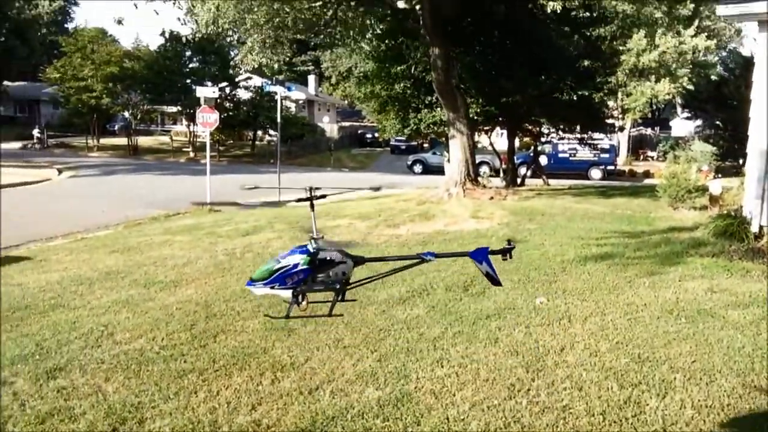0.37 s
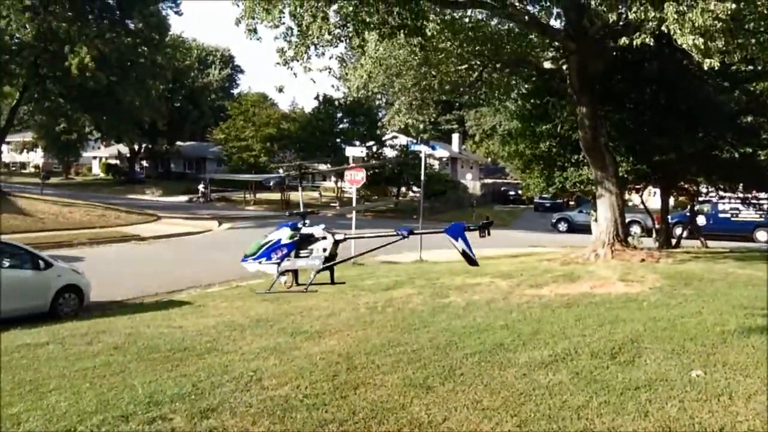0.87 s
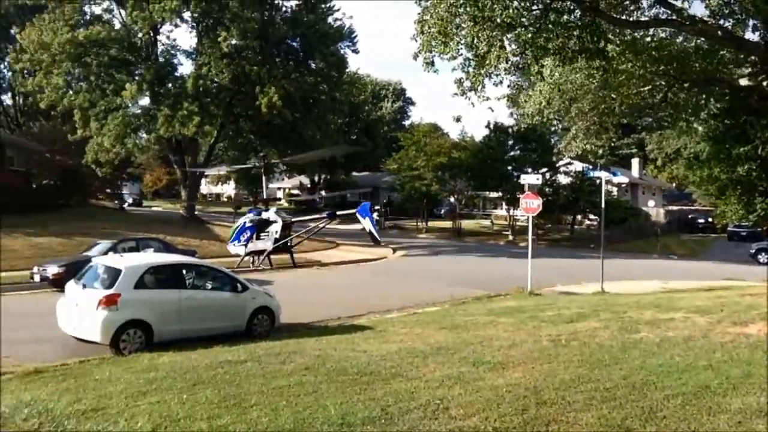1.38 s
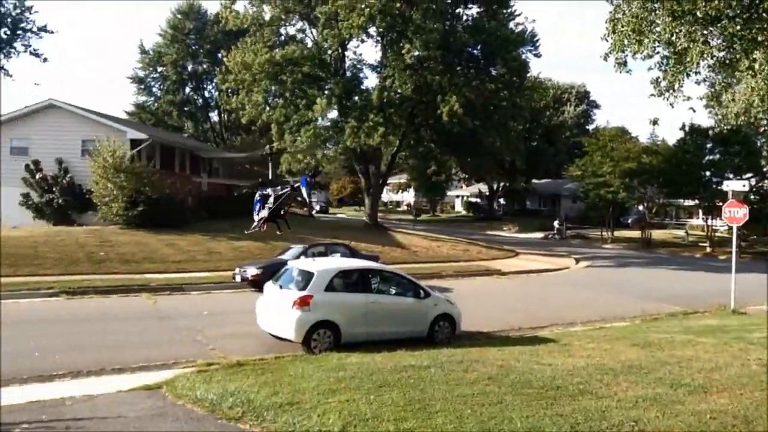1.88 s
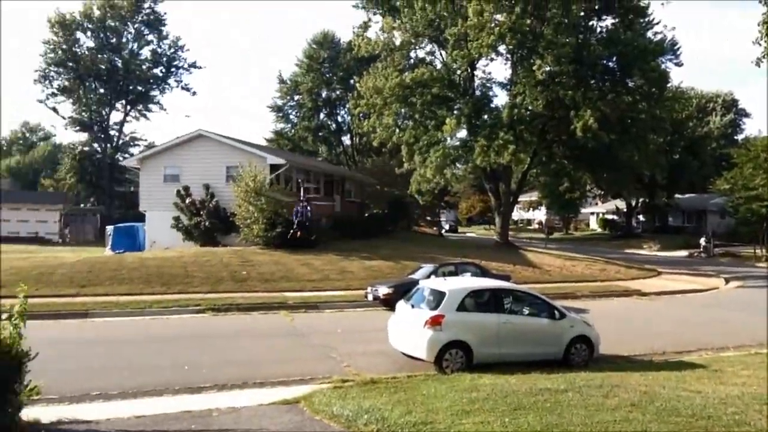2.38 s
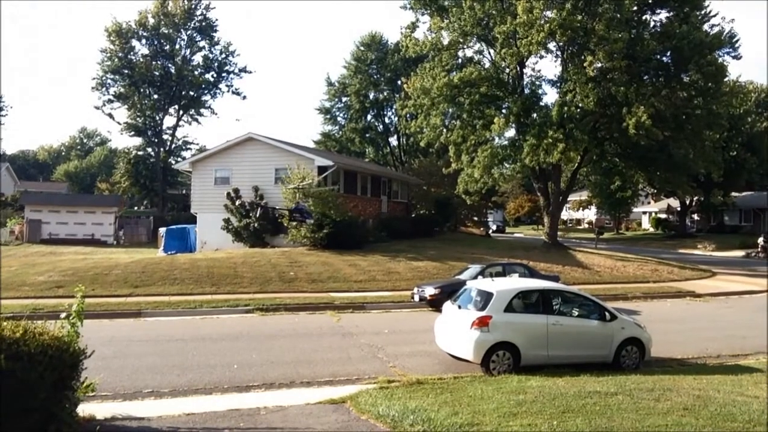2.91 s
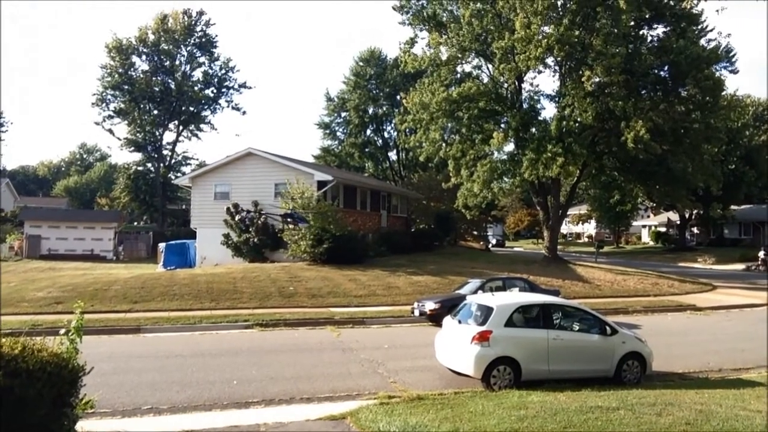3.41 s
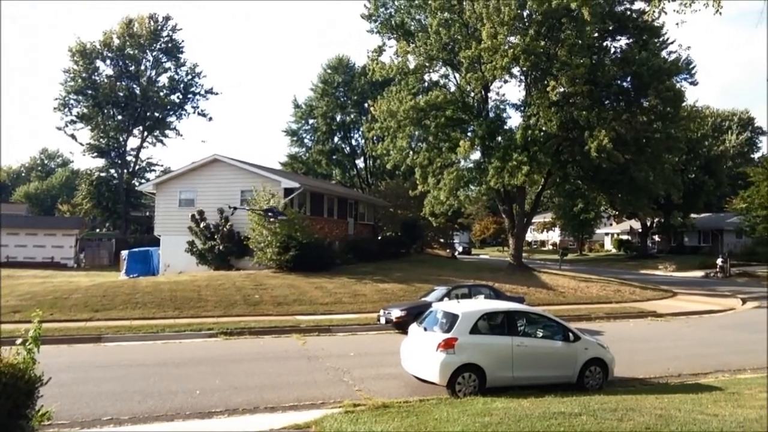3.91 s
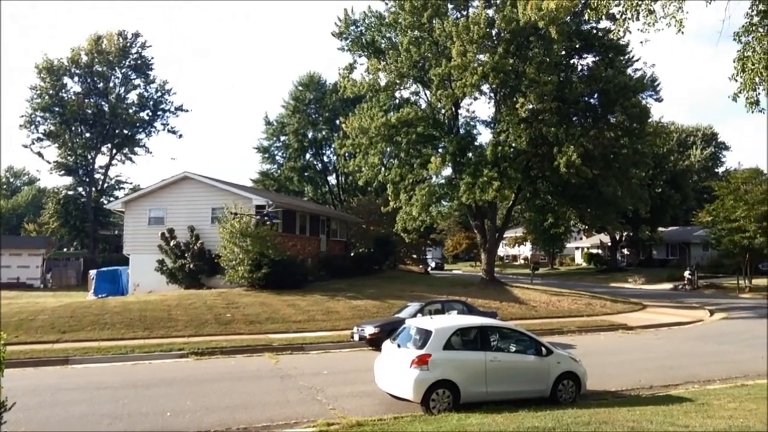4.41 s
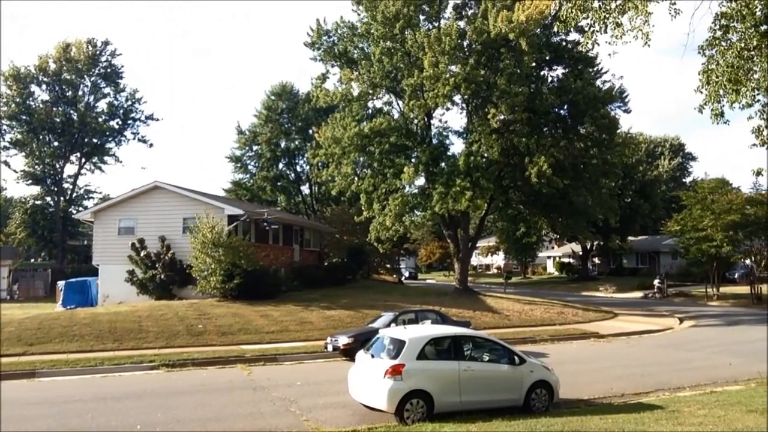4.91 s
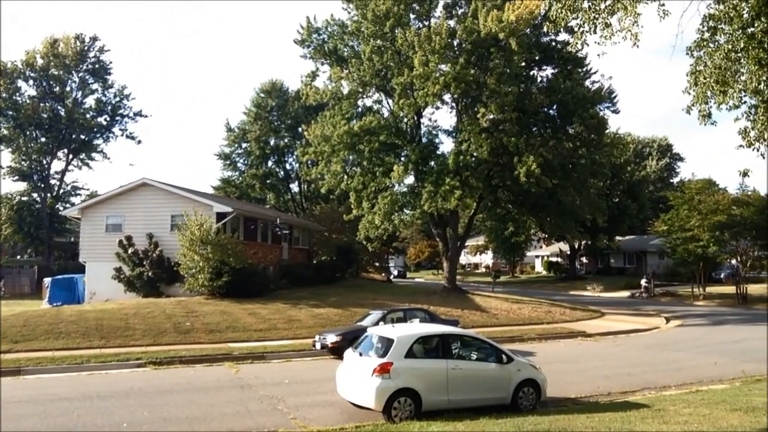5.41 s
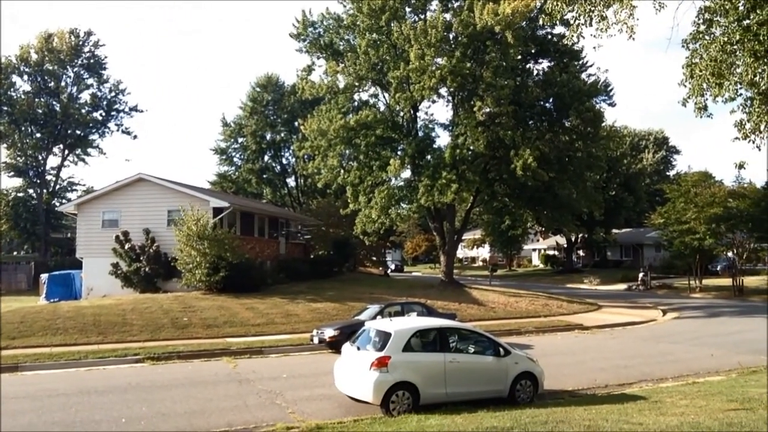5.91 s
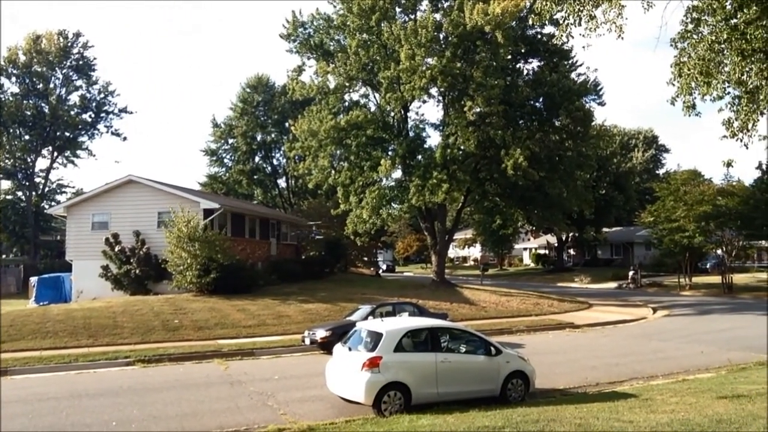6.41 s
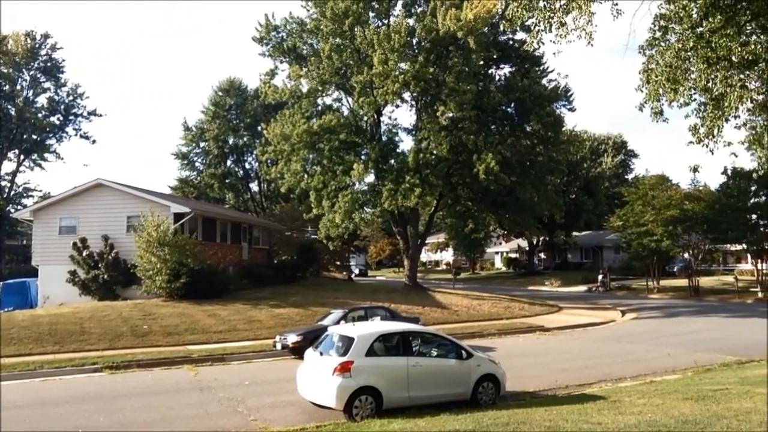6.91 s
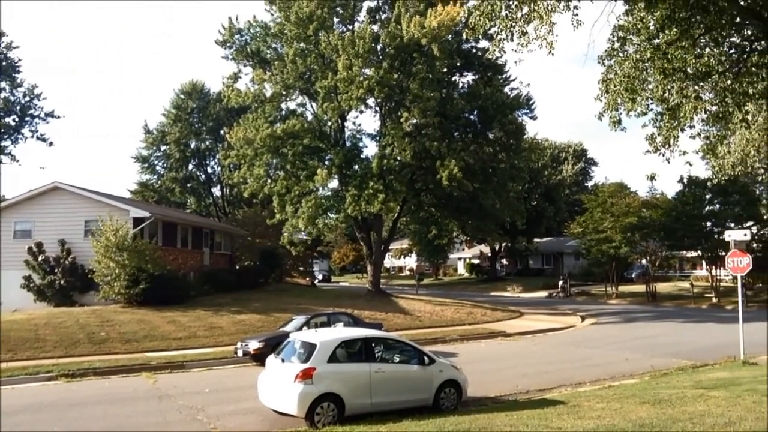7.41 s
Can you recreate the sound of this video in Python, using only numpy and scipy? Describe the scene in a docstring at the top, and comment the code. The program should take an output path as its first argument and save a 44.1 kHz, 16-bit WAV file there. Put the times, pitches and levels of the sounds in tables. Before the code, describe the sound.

A toy-sized electric helicopter is already flying close to the microphone, with two high gear whines gliding against each other over gear rattle and strong brushy hiss. A small tail motor hums below. After about two seconds it flies away, steadily growing quieter and duller, its pitch wavering. A very faint street rumble lies beneath. Open outdoor lawn, one fixed microphone, identical in both channels.

```python
"""A small electric model helicopter with two counter-turning rotors hovers close, then flies off over a lawn.
Each rotor has its own motor and two-stage gear: two whines, built from the tooth-mesh tones of each motor shaft,
glide against each other over filtered noise, the hiss of brushes and blades. A tail motor hums below.
A quiet street lies under it: shaped rumble and the hum of one passing car. One microphone hears it all."""
import sys
import numpy as np
from scipy import signal
from scipy.fft import rfft, irfft, next_fast_len
from scipy.io import wavfile
from scipy.ndimage import uniform_filter1d, map_coordinates

SR = 44100
rng = np.random.default_rng(int(sys.argv[2]) if len(sys.argv) > 2 else 0)


def inscribe(sig):
    """Save sig as 16-bit PCM at rate SR to the path in sys.argv[1].

    A 1-D sig is mono; a 2-D sig holds one channel per row.
    Samples are clipped to [-1, 1] before scaling.
    """
    pcm = np.round(np.clip(np.atleast_2d(sig).T, -1, 1) * 32767)
    wavfile.write(sys.argv[1], SR, pcm.astype(np.int16))


def invert_db(level):
    """Linear amplitude ratio for a level in decibels (20 dB per decade), elementwise."""
    return 10 ** (np.asarray(level, dtype=float) / 20)


N = 332955

# the craft's way out from the microphone: (time [s], distance [m], treble tilt of the hiss [dB, full at 19 kHz])
FLIGHT_PATH = [(0, 1.98, -3), (.2, 1.98, -0.5), (1.3, 2.03, -2), (1.6, 2.22, -0.5), (2.67, 4.57, -2.5),
               (3.36, 6.1, 0), (3.8, 6.3, 0), (4.2, 7.44, -0.5), (4.7, 8.7, -3.5), (6, 11.7, -5),
               (7.55, 13.2, -7.5)]
PINION, IDLER, SECOND = 8, 31, 22  # teeth: motor pinion, idler wheel, second-stage pinion


def unit(x):
    """Scale to rms 1."""
    return x / np.sqrt(np.mean(x ** 2) + 1e-20)


def along(points, hz):
    """Read (Hz, value) points on a log frequency axis."""
    f, v = np.transpose(points)
    return np.interp(np.log(hz + 1), np.log(f + 1), v)


def curves(rows):
    """One value per sample for each column after the time."""
    s, *cols = np.transpose(rows)
    return [np.interp(np.arange(N) / SR, s, c) for c in cols]


def wobble(rate):
    """A random curve of straight pieces between normal knots, rate knots a second."""
    knots = rng.standard_normal(int(N * rate / SR) + 4)
    return map_coordinates(knots, [np.arange(N) * rate / SR], order=1)


def turns(hz):
    """Phase in radians of a turning shaft; its speed is smoothed over 50 ms, as by inertia."""
    return 2 * np.pi * np.cumsum(uniform_filter1d(hz, size=2200)) / SR


def filtered(x, response):
    """x shaped by a response, a function of frequency in Hz."""
    m = next_fast_len(N + 8192)
    spectrum = rfft(x, m) * response(np.fft.rfftfreq(m, 1 / SR))
    return irfft(spectrum, m)[..., :N]


def tone(phase, db, flutter_db, drift):
    """A line at rms level db that flutters in level and, by drift radians, in phase, like a rocking craft."""
    level = invert_db(db + flutter_db * wobble(22))
    return level * np.sqrt(2) * np.sin(phase + drift * wobble(45) + 7 * rng.random())


def blurred(phase, db, rate):
    """A band of noise riding on a moving order; more knots a second spread it wider."""
    return invert_db(db) * unit(wobble(rate) * np.sin(phase) + wobble(rate) * np.cos(phase))


def street():
    """Far traffic as noise shaped into a slowly swaying rumble, and one passing car as a gliding hum."""
    # spectrum of the far rumble: (frequency [Hz], relative level [dB])
    rumble_shape = [(20, -45), (60, -18.5), (130, -8.5), (240, 3), (500, -8), (900, -1), (1500, -15.5),
                    (3300, -50)]
    # hum of the passing car: (time [s], frequency [Hz], level [dB])
    car_hum = [(5.8, 108.3, -87), (6.02, 112.7, -71), (6.38, 112.1, -66), (7.28, 117.1, -72),
               (7.5, 117.6, -78)]
    hz, db = curves(car_hum)
    rumble = unit(filtered(rng.standard_normal(N), lambda f: invert_db(along(rumble_shape, f))))
    rumble_db = -55 + 0.71 * wobble(3.08)
    return invert_db(rumble_db) * rumble + tone(turns(hz), db, flutter_db=0.5, drift=.2)


def craft_db():
    """Reference level of the craft at the microphone: amplitude falls as one over distance."""
    at_1m_db = -29
    return at_1m_db - 20 * np.log10(curves(FLIGHT_PATH)[0])


def strength_db(name):
    """Level of a named tone: it follows the craft's reference level, plus its own swells."""
    # usual strength: {tone name: level [dB re the craft's reference level]}
    usual_tone_level_db = {"fast 1": -7.5, "fast 2": -1, "fast 3": -7.5, "slow 1": -10.5, "slow 2": -2,
                           "slow 3": 1, "second stage": -11, "blades": -27, "imbalance": -22, "brushes":
                           -23.5, "fast 4": -5.5, "fast 6": -12, "tail brush": -17, "tail blades": -31.5,
                           "slow second stage": -16.5, "slow 4": -10, "slow 5": -14, "fast rattle": -0.5,
                           "slow rattle": 0}
    # swells and dips as the craft turns: (tone name, start [s], end [s], change [dB])
    swell_rows = [("fast 1", 0.52, 1.27, 10), ("fast 1", 1.533, 1.855, 13.4), ("fast 1", 1.99, 2.14, 14),
                  ("fast 1", 2.22, 2.445, 16), ("fast 1", 2.52, 3.086, 15), ("fast 1", 3.1, 3.5, 10),
                  ("fast 1", 3.85, 4.7, 13), ("fast 1", 7.35, 7.6, 8), ("fast 2", -.1, 0.086, 7),
                  ("fast 2", 0.14, 0.39, 1.5), ("fast 2", .52, 1.55, -5.5), ("fast 2", 1.52, 2.42, 4),
                  ("fast 2", 3.2, 3.36, 4.6), ("fast 2", 3.7, 4.08, 6.1), ("fast 2", 4.25, 4.75, 6.2),
                  ("fast 2", 4.8, 6.1, -4.5), ("fast 2", 6.25, 7.4, 7.3), ("fast 3", 0.61, 1, 7.2),
                  ("fast 3", 2.7, 3.15, 4), ("fast 3", 3.2, 4.02, 4), ("fast 3", 4.15, 4.5, 4.4),
                  ("fast 3", 4.88, 6.28, 8.3), ("fast 3", 6.3, 6.2, -8), ("fast 3", 7.12, 8.4, 7),
                  ("slow 1", 0.037, .36, 9), ("slow 1", .36, .6, 4), ("slow 1", 2.6, 3.04, 6.2),
                  ("slow 1", 3.3, 3.85, 7), ("slow 1", 3.95, 4.75, -10), ("slow 1", 4.8, 5.4, 5),
                  ("slow 2", -.1, .3, 2), ("slow 2", 0.28, 0.916, 6), ("slow 2", 0.93, 1.12, 8),
                  ("slow 2", 1.17, 1.46, 11), ("slow 2", 1.65, 2.44, 3.4), ("slow 2", 2.66, 3.13, 4.2),
                  ("slow 2", 3.44, 3.82, 5.5), ("slow 2", 3.95, 4.55, 6.6), ("slow 2", 4.75, 5.15, 2.8),
                  ("slow 2", 5.15, 5.8, 8), ("slow 2", 6.36, 6.95, 2.8), ("slow 2", 7.15, 7.6, 9),
                  ("slow 3", 0.016, 0.17, 8.8), ("slow 3", 1.2, 1.61, 8.5), ("slow 3", 1.6, 2, 2.5),
                  ("slow 3", 2.4, 3.15, -1.5), ("slow 3", 3.6, 3.85, 6.7), ("slow 3", 4.3, 4.75, 6.3),
                  ("slow 3", 5.1, 5.7, -4), ("slow 3", 5.78, 6.3, 2), ("slow 3", 6.42, 6.96, 6.2),
                  ("slow 3", 7.1, 7.45, 5), ("second stage", 0.9, 1.76, 7.5),
                  ("second stage", 1.92, 2.14, 8.5), ("second stage", 2.3, 2.65, 9),
                  ("second stage", 2.65, 3.05, 13), ("second stage", 3.2, 4.1, -10),
                  ("second stage", 5.5, 6, 8), ("second stage", 6.04, 7.6, 11.8),
                  ("blades", 3.05, 3.78, 11.7), ("imbalance", -.1, 0.94, 3.8),
                  ("imbalance", 3.08, 3.74, 7.3), ("brushes", -.1, .36, 12), ("brushes", 2.03, 3.2, 9.6),
                  ("brushes", 3.2, 4.4, 13.3), ("brushes", 5.3, 6.4, 12.3), ("slow 4", -.1, .5, 9.2),
                  ("slow 4", 5.05, 5.45, 9.2), ("fast rattle", 3.45, 4.05, 6), ("fast 4", -.1, 0.75, 2.3),
                  ("fast 4", 3.8, 5.6, -7), ("fast 6", .05, .42, 10), ("fast 6", 1.5, 2.1, 5),
                  ("fast 6", 3.45, 4.25, 9), ("fast 6", 4.9, 7.6, -6), ("tail brush", -.1, .3, -15),
                  ("tail brush", 0.38, 1.53, 6), ("tail brush", 1.55, 2.275, 10.1),
                  ("tail brush", 2.3, 2.75, 5.4), ("tail brush", 2.78, 3.7, 12.5),
                  ("tail brush", 4.95, 5.35, 7.5), ("tail brush", 6.4, 6.8, 6.7),
                  ("tail blades", 0.36, 2.2, 12.3), ("tail blades", 2.18, 4.1, 8.7),
                  ("tail blades", 6.4, 7.5, 13)]
    fade_s = 0.13
    t = np.arange(N) / SR
    level_db = craft_db() + usual_tone_level_db[name]
    for who, start, end, db in swell_rows:
        if who == name:
            level_db = level_db + db * np.clip(np.minimum(t - start, end - t) / fade_s + .5, 0, 1)
    return level_db


def tail_motor():
    """The tail motor's commutator tone, its third harmonic, and the tail blades two to every seven contacts."""
    # tail motor speed: (time [s], brush tone [Hz])
    tail_speed = [(.3, 615), (.9, 641), (1.3, 633), (2, 651), (2.8, 656), (3.8, 640), (4, 727), (4.7, 750),
                  (7, 765)]
    blades, contacts = 2, 7  # per turn
    brush = turns(*curves(tail_speed))
    blade_db = strength_db("tail blades")
    hum = tone(brush, strength_db("tail brush"), flutter_db=1.5, drift=0.51)
    hum += tone(brush * blades / contacts, blade_db, flutter_db=0.5, drift=0.13)
    return hum + tone(3 * brush, blade_db + 5, flutter_db=7.0, drift=0.95)


def hiss(idler):
    """Brush and blade noise in random patches; its treble throbs once per idler turn and once every two."""
    # spectrum of the hiss: (frequency [Hz], relative level [dB])
    hiss_shape = [(40, -47), (90, -29.5), (170, -14.5), (450, -11), (700, -9), (1380, -10), (2300, -1.5),
                  (3200, -6.5), (4400, -1), (6500, -4.5), (8500, -5.5), (12000, -7.5), (14800, -6),
                  (16000, -17)]
    # the lawn's echo comes sooner as the craft recedes: (time [s], delay [ms], share [0-1])
    lawn_echo = [(0, 1.36, 0), (2.5, 1.21, 0.12), (3.7, 1.075, 0.4), (5, 1.03, 0.31), (7.55, 0.95, 0)]
    metres, treble_db = curves(FLIGHT_PATH)
    bass_db = -2 + 0.92 * np.log2(metres)  # the lows fall off more slowly with distance
    hz, t, z = signal.stft(rng.standard_normal(N), SR, nperseg=512)
    hz = hz[:, None]
    at = np.minimum((t * SR).astype(int), N - 1)

    patches = uniform_filter1d(rng.standard_normal(z.shape), size=7, axis=0)
    patches = uniform_filter1d(patches, size=16, axis=1)
    walls = uniform_filter1d(rng.standard_normal(z.shape), size=2, axis=0)
    walls = uniform_filter1d(walls, size=70, axis=1)  # walls colour it slowly
    high = np.clip(np.log2((hz + 1) / 5500) / 1.8, 0, 1)
    low = np.clip(np.log2(2400 / (hz + 1)) / 1.7, 0, 1)
    shape_db = high * treble_db[at] + low * bass_db[at] + 0.61 * unit(patches) + 1.46 * unit(walls)

    s, delay_ms, share = np.transpose(lawn_echo)
    soft = np.interp(t, s, share) / (1 + (hz / 1800) ** 2)  # grass returns little treble
    lawn = 1 + soft * np.exp(-2j * np.pi * hz * np.interp(t, s, delay_ms) / 1000)
    noise = signal.istft(z * lawn * invert_db(shape_db), SR, nperseg=512)[1][:N]
    noise = filtered(noise, lambda f: invert_db(along(hiss_shape, f) - along(hiss_shape, 3485)))
    treble = filtered(noise, lambda f: 1 / (1 + (9000 / (f + 1)) ** 6))
    throb = .16 * np.sin(idler) + .1 * np.sin(idler / 2) + .08 * wobble(14)
    return invert_db(craft_db() + 13.5) * (noise + throb * treble)


def weak_orders(upper, lower):
    """Weaker multiples of each motor shaft's turning, as clean lines or as bands of noise."""
    # orders of the faster motor: (frequency [shaft turns])
    fast_orders = [2 * 8 / 31, 1, 3, 32, 48]
    # in the same sequence: {tone name: blur [knots per s], 0 = a clean line}
    fast_blur = {"blades": 0, "imbalance": 0, "brushes": 0, "fast 4": 140, "fast 6": 450}
    # orders of the slower motor: (frequency [shaft turns])
    slow_orders = [22 * 8 / 31, 32, 40]
    # in the same sequence: {tone name: blur [knots per s]}
    slow_blur = {"slow second stage": 10, "slow 4": 100, "slow 5": 180}
    out = np.zeros(N)
    for k, (name, rate) in zip(slow_orders, slow_blur.items()):
        out += blurred(k * lower, strength_db(name), rate)
    for k, (name, rate) in zip(fast_orders, fast_blur.items()):
        db = strength_db(name)
        out += blurred(k * upper, db, rate) if rate else tone(k * upper, db, flutter_db=0.4, drift=0.19)
    return out


def motor(shaft, mesh_db, loose_db):
    """Pinion teeth meshing: harmonics of the tooth rate, eccentric sidebands one shaft turn off, and rattle."""
    # sidebands, a row per harmonic: (below [dB], above [dB]) re the mean of harmonic and craft levels
    sidebands = [(-16, -9), (-7, -8.5), (-8, -10.5)]
    # rattle of the teeth, a row per harmonic: (level [dB re the motor's rattle], blur [knots per s])
    tooth_rattle = [(-12.5, 300), (-5, 400), (-2, 410)]
    # unsteadiness, a value per harmonic: (phase drift [rad])
    mesh_drift = [.3, .45, .9]
    level_db = craft_db()
    out = np.zeros(N)
    rotor = shaft * PINION / IDLER / 4
    shake = 0.15 * np.sin(rotor) + 0.22 * np.sin(2 * rotor)  # the turning blades rock the gears
    chop = 1 + .14 * np.sin(2 * rotor)  # and shade them twice a turn
    for k, db in enumerate(mesh_db):
        order = PINION * (k + 1)
        below_db, above_db = sidebands[k]
        rattle_db, rate = tooth_rattle[k]
        out += tone(order * shaft + (k + 1) * shake, db, flutter_db=3, drift=mesh_drift[k])
        beam_db = .5 * (db + level_db)  # sidebands partly follow the harmonic they flank
        out += blurred((order - 1) * shaft, beam_db + below_db, 22)
        out += blurred((order + 1) * shaft, beam_db + above_db, 22)
        out += blurred(order * shaft, loose_db + rattle_db, rate)
    return chop * out


def helicopter():
    """Two main motors, the second gear stage of the faster one, weak orders, the tail motor and the hiss."""
    # pilot's controls: (time [s], throttle = mean shaft speed [Hz], rudder = faster minus slower shaft [Hz])
    pilot_sticks = [(0.0, 293.3, 21.5), (0.28, 284.7, 23.9), (0.6, 282.5, 25.8), (1.04, 285.0, 25.4),
                    (1.28, 291.6, 23.3), (1.8, 290.4, 25.4), (2.2, 284.8, 30.4), (2.4, 286.5, 30.1),
                    (2.64, 294.4, 6.4), (3.24, 295.3, 10.1), (3.4, 296.5, 27.9), (3.6, 301.9, 29.6),
                    (3.76, 303.5, 27.6), (4.0, 295.2, 29.6), (4.84, 281.8, 22.7), (5.32, 271.2, 26.4),
                    (5.56, 281.5, 20.3), (5.72, 290.2, 9.7), (5.84, 292.4, 0.2), (6.0, 292.0, 0.0),
                    (6.16, 296.0, 0.1), (6.28, 297.8, 8.8), (6.52, 290.0, 35.1), (7.0, 287.0, 35.9),
                    (7.16, 285.2, 30.2), (7.55, 284.4, 24.3)]
    throttle_hz, rudder_hz = curves(pilot_sticks)
    upper = turns(throttle_hz + rudder_hz / 2)
    lower = turns(throttle_hz - rudder_hz / 2)
    idler = upper * PINION / IDLER
    upper_db, lower_db = [[strength_db(who + k) for k in "123"] for who in ("fast ", "slow ")]
    second = tone(SECOND * idler, strength_db("second stage"), flutter_db=2.2, drift=.4)
    mains = motor(upper, upper_db, strength_db("fast rattle"))
    mains += motor(lower, lower_db, strength_db("slow rattle"))
    return mains + weak_orders(upper, lower) + second + tail_motor() + hiss(idler)


def scene():
    """Helicopter over street; one microphone feeds both channels."""
    return np.tile(helicopter() + street(), (2, 1))


def housing(x):
    """The microphone's housing cuts a row of notches that move with the direction of the sound."""
    # notches: (frequency [Hz], width [Hz], share removed [0-1]), before the bearing alters them
    notches = [(2696, 490, 0.76), (5460, 277, 0.73), (8030, 360, 0.31), (10900, 680, 0.44),
               (13730, 710, 0.7)]
    # they slide and deepen with the craft's bearing: (time [s], stretch [%], depth [ratio to usual])
    craft_bearing = [(0, -2, 1.05), (.8, -3.2, 1.01), (1.3, -0.5, 0.98), (2.2, -1, 0.95), (3.7, 2, 1.06),
                     (4.4, 3, 1.15), (5, 0.5, 1.1), (6.5, 1.7, 1.06), (7.55, 2, 1.05)]
    hz, t, z = signal.stft(x, SR, nperseg=1024)
    s, stretch, depth = np.transpose(craft_bearing)
    f = hz[:, None] / (1 + np.interp(t, s, stretch) / 100)
    for notch_hz, width_hz, share in notches:
        removed = np.clip(share * np.interp(t, s, depth), 0, 1)
        z = z * (1 - removed / (1 + (2 * (f - notch_hz) / width_hz) ** 2))
    return signal.istft(z, SR, nperseg=1024)[1][..., :N]


def top_cut(x):
    """Nothing passes above the cut-off."""
    return signal.sosfilt(signal.butter(12, 16570, fs=SR, output="sos"), x)


def record(dry):
    """The microphone: housing notches and a sharp band limit, the same on both channels."""
    top_hz = 15330
    mono = filtered(housing(dry[0]), lambda hz: hz < top_hz)
    return top_cut(np.array([mono, mono]))


dry = scene()
out = record(dry)
inscribe(out)
```